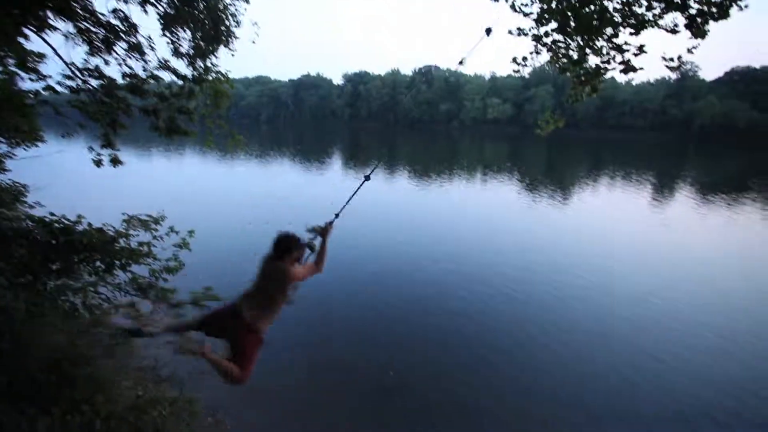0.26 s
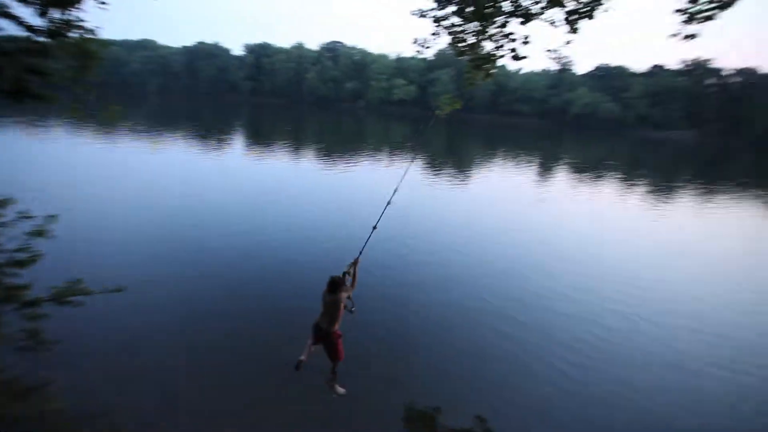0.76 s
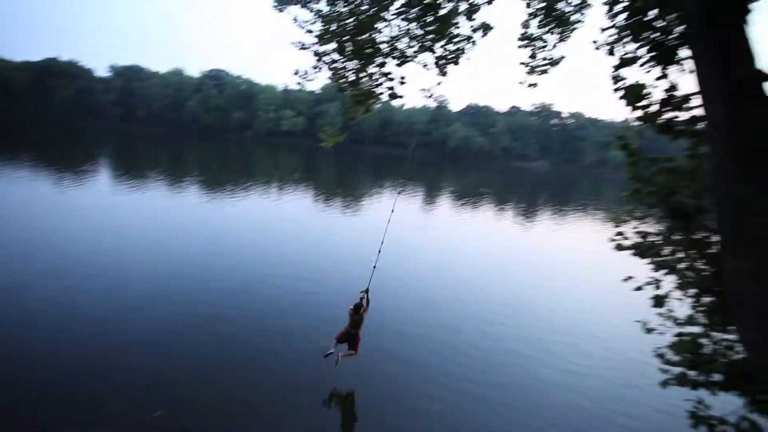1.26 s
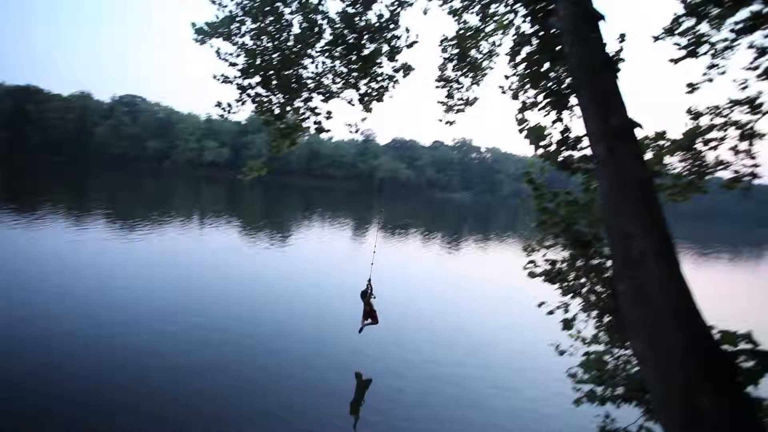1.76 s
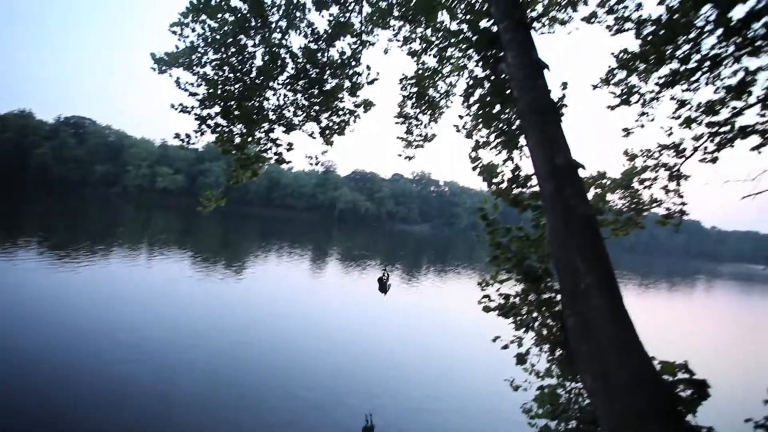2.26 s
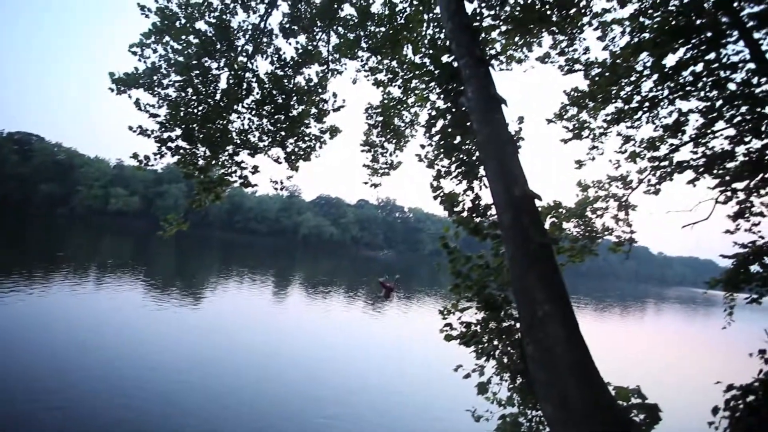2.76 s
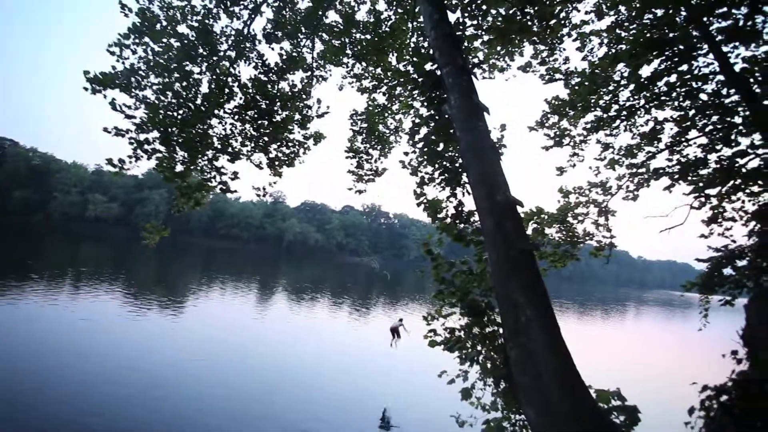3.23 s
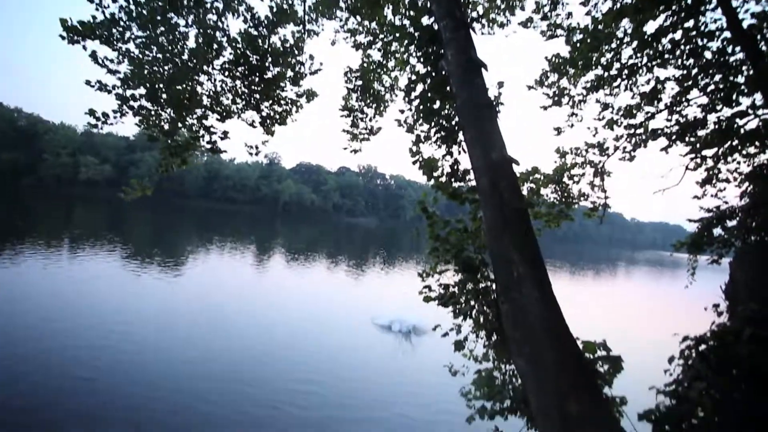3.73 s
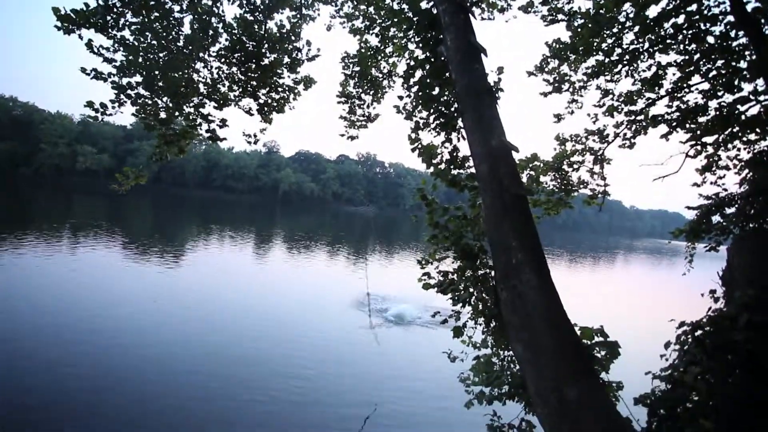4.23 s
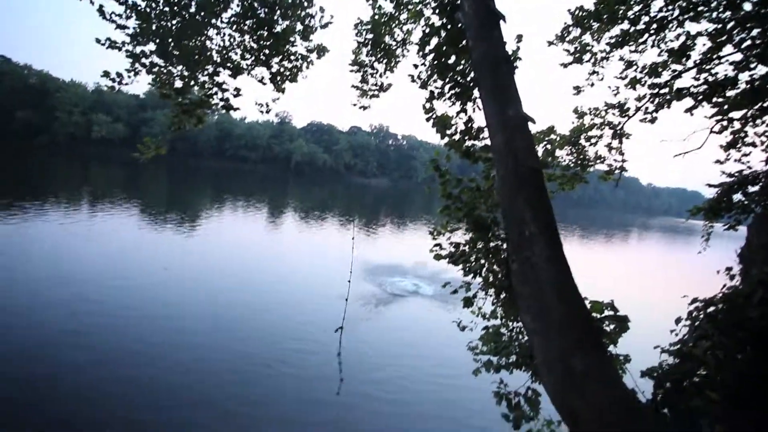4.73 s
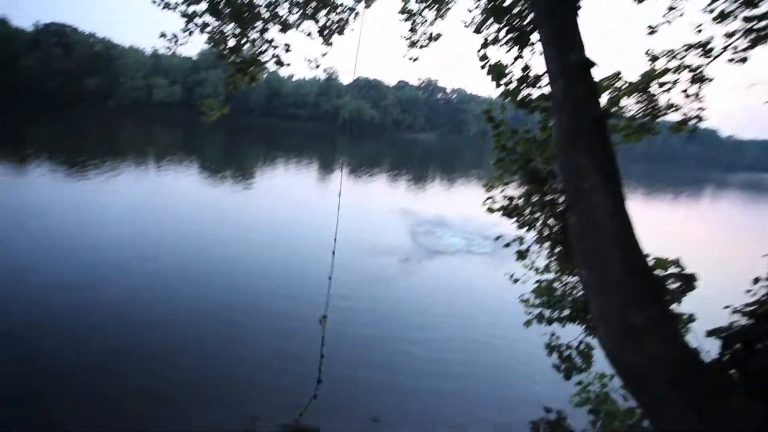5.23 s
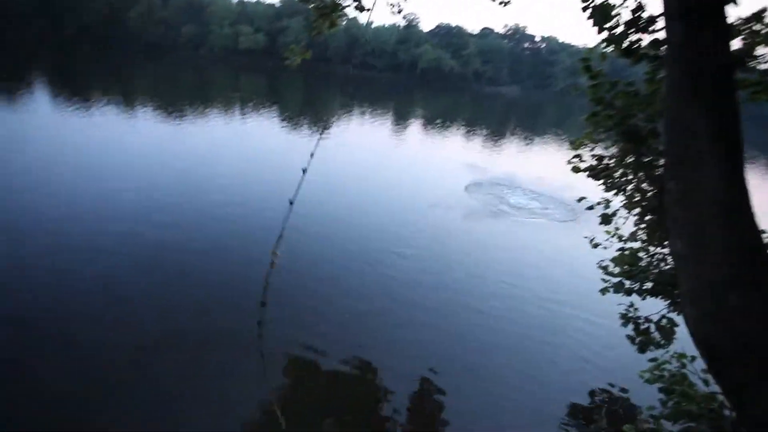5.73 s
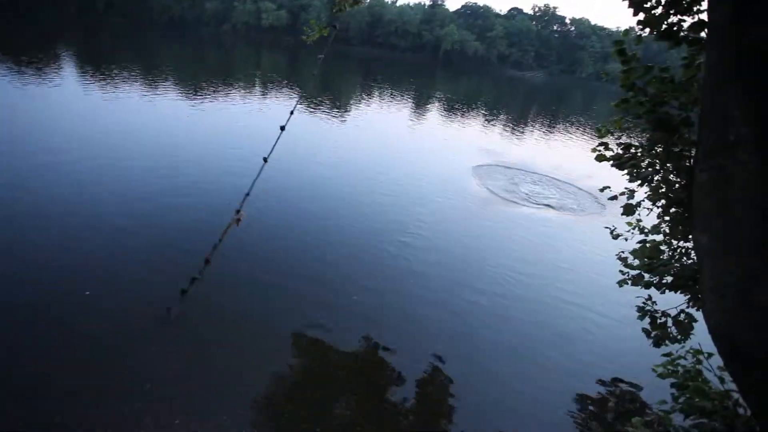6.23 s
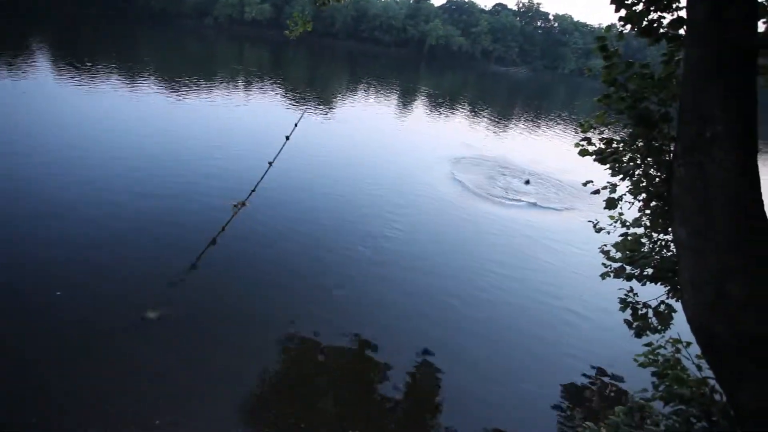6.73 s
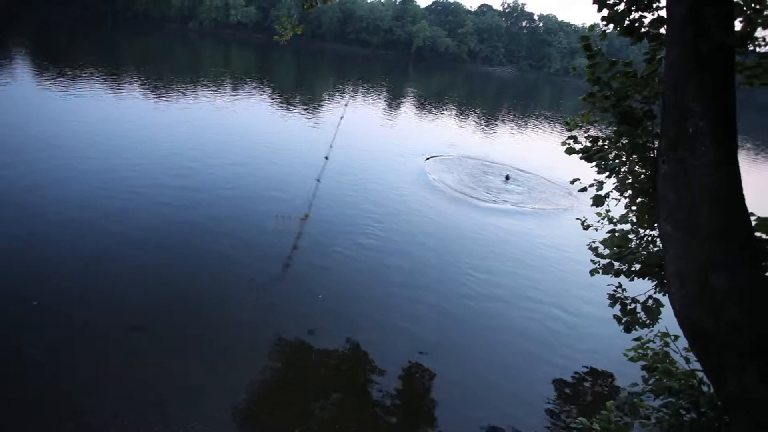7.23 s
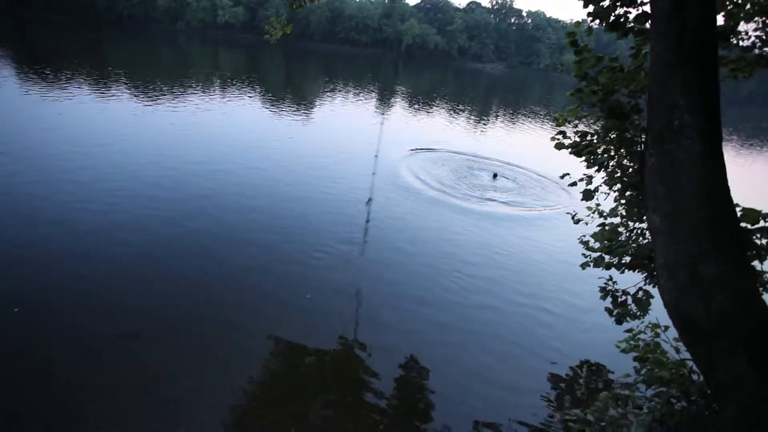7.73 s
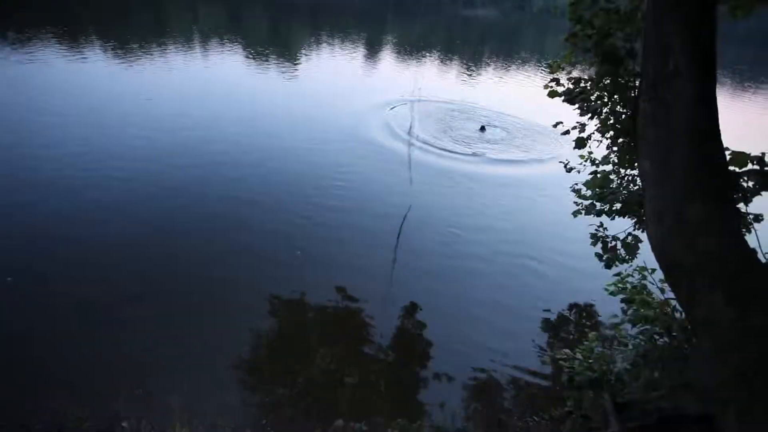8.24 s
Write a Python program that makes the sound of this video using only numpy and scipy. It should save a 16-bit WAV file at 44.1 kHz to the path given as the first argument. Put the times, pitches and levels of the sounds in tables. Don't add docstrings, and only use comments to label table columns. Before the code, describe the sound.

Outdoors by a wooded lake, cicadas hiss brightly and continuously, with weak far-off engines below. First comes a dry twig crack and leaf brush, then a small rope creak. After a pause, feet, legs and body slap the water in quick succession, followed by gulping bubbles and spray. A shower of droplets falls and thins; near the end small hollow water knocks and lapping come close. The camera's automatic gain ducks after the splash, then recovers.

```python
import sys
import numpy as np
from scipy import signal
from scipy.fft import rfft, irfft, next_fast_len
from scipy.io import wavfile
from scipy.ndimage import uniform_filter1d, map_coordinates

SR = 44100
rng = np.random.default_rng(int(sys.argv[2]) if len(sys.argv) > 2 else 0)


def field_ratio(decibels):
    return 10 ** (np.asarray(decibels, dtype=float) / 20)


def inscribe(sig):
    pcm = np.round(np.clip(np.atleast_2d(sig).T, -1, 1) * 32767)
    wavfile.write(sys.argv[1], SR, pcm.astype(np.int16))


N = 374409
TIME = np.arange(N) / SR

# f/Hz, width/Hz, level/dB
TYMBAL_MODES = [(4650, 67, -16), (6000, 750, -7)]
# f/Hz, level/dB per Hz
CHORUS_SPECTRUM = [(1500, -65.5), (2500, -32.5), (3470, -25), (4200, -11), (5010, -9), (5760, -1.5),
                   (6180, 1.5), (6870, 0), (8330, -6), (10100, -23), (11000, -34), (13000, -37.5),
                   (15800, -52)]
# t/s, level/dB
CHORUS_EFFORT = [
    (0, -1),
    (2.1, .5),
    (2.4, 0),
    (3.2, .5),
    (5, 0),
    (8.4, 0),
]
# f/Hz, level/dB per Hz
AIR_SPECTRUM = [(15, -57.5), (25, -15.5), (92, -4.5), (186, -8.5), (224, -7), (259, -8), (353, -14.5),
                (556, -18), (774, -15), (992, -13), (1560, -12.5), (2620, -22.5), (3500, -25.5),
                (4550, -61), (7700, -120)]
# f/Hz, level/dB per Hz
RUMBLE_SPECTRUM = [(18, -46), (30, -24.5), (38, -15), (54, -1), (92, 4), (118, -13), (150, -12), (167, -5),
                   (180, -0.5), (230, -40.5), (400, -120)]
# t/s, peak level/dB
TRAFFIC_PASSES = [
    (0, -54),
    (1.8, -48),
    (3.2, -42),
    (5.2, -39),
    (7.4, -37.5),
]
# t/s, peak level/dB
MOTOR_REVS = [
    (.95, -32.5),
    (2.0, -37),
    (2.65, -36.5),
    (3.4, -41.5),
    (5.5, -41.5),
]
# t/s, peak level/dB
ENGINE_PULSES = [
    (0, -39),
    (.8, -46),
    (2.5, -40),
]
# f/Hz, level/dB, t60/s
TWIG_MODES = [(1910, -2, 0.021), (2350, 0, 0.016), (2800, -17, 0.022), (3590, 11, 0.0064),
              (4200, -6.5, .012), (3080, -9, 0.021), (10560, -18, .004)]
# t/s, peak level/dB
LEAF_BRUSHES = [
    (.165, -36.5),
    (.215, -40),
]
# f/Hz, level/dB per Hz
LEAF_SPECTRUM = [(800, -19), (1600, -12), (2600, -9.5), (3500, -4.5), (8000, 3), (12000, -14.5),
                 (15500, -17)]
# t/s, peak level/dB, f/Hz
ROPE_CREAKS = [
    (2.123, -31, 553),
    (2.151, -26.5, 546),
    (2.18, -24.5, 562),
    (2.235, -28.5, 555),
]
# t/s, level/dB, t60/s, low f/Hz, high f/Hz
WATER_SLAPS = [
    (3.474, -4.5, 0.016, 300, 4500),
    (3.478, -8.5, .03, 396, 5040),
    (3.488, -15, 0.013, 1500, 5000),
    (3.5113, 0, .02, 2020, 4500),
    (3.515, 9, 0.012, 500, 3500),
    (3.54, -19, .006, 1990, 11950),
    (3.5705, 2, .003, 5000, 12000),
    (3.5905, 14.5, 0.0055, 1400, 9000),
    (3.5935, 2, 0.013, 1500, 5830),
]
# t/s, level/dB, f/Hz, t60/s
CLOSING_CAVITIES = [(3.474, -17, 1100, .04), (3.475, -15, 450, .05), (3.512, -3, 680, .035),
                    (3.518, -4, 620, .03), (3.512, -13, 400, .04), (3.538, -15, 520, .05),
                    (3.5912, -4, 1620, .014), (3.5912, -5, 1900, .012), (3.571, -1, 8800, .005),
                    (3.5915, 0, 4750, .016), (3.5915, -7, 5500, .012), (3.63, -30, 400, .06),
                    (3.955, -29, 420, .07), (4.02, -30, 400, .07)]
# t/s, peak level/dB, f/Hz
AIR_GULPS = [
    (3.514, -12, 119),
    (3.548, -17, 132),
    (3.698, -18, 137),
    (3.729, -18.5, 110),
    (3.804, -19.5, 176),
    (3.85, -27, 134),
    (3.953, -21, 152),
    (3.975, -22, 207),
]
# t/s, strength level/dB
WATER_SURGES = [
    (3.474, 1.5),
    (3.512, 1),
    (3.55, -2),
    (3.597, 11),
]
# level/dB, fall/(dB/s)
SURGE_LAYERS = [
    (-24.5, 69),
    (-17.5, 94.5),
    (-35, 89),
]
# t/s, strength level/dB
WATER_SHOWERS = [
    (3.83, -2.5),
    (4.0, -5),
    (4.27, 2),
    (4.63, -4.5),
    (5.07, -11),
    (5.5, -14.5),
]
# level/dB, rise/(dB/s), fall/(dB/s), lag/s
SHOWER_LAYERS = [
    (-26, 16.8, 14.5, 0.054),
    (-19.5, 27.6, 24.5, -0.004),
    (-29, 14, 24, -.02),
]
# f/Hz, level/dB per Hz
BUBBLE_SPECTRUM = [(120, -38.5), (200, -7.5), (324, -1), (433, -5.5), (514, -5), (660, 0), (807, -7.5),
                   (883, -4.5), (1170, -1.5), (1410, -6.5), (1610, -1.5), (2200, -18), (2860, -31),
                   (4840, -120)]
# f/Hz, level/dB per Hz
SPRAY_SPECTRUM = [(900, -18), (1800, -7), (3000, -2), (5000, 0), (8000, 3.5), (11000, -11.5),
                  (15800, -36.5)]
# f/Hz, level/dB per Hz
MIST_SPECTRUM = [(6000, -13.5), (9500, 3), (11000, -2.5), (13000, -6), (15700, -12.5)]
# t/s, peak level/dB
LAKE_HEAVES = [
    (3.62, -22),
    (4.6, -40),
    (5.4, -46),
]
# t/s, peak level/dB, f/Hz
FALLING_DROPS = [(4.003, -17, 1190), (4.146, -12, 1700), (4.247, -15, 1590), (4.38, -12, 1180),
                 (4.421, -13.5, 655), (4.467, -24.5, 2780), (4.53, -15, 1180), (4.601, -9, 1670),
                 (4.66, -18, 660), (4.71, -18, 623), (4.869, -15, 1630), (4.94, -15, 1180),
                 (5.057, -13, 1200), (5.188, -18, 1220), (5.305, -13, 1730), (5.586, -32, 678),
                 (6.398, -23, 1130), (6.922, -24, 934), (7.558, -25, 3000), (8.119, -24, 1680)]
# t/s, peak level/dB, rise/(dB/s), fall/(dB/s)
MIST_DRIFTS = [
    (5.7, -45, 13, 3),
    (8.36, -39.5, 34, 30),
]
# t/s, peak level/dB
HOLLOW_KNOCKS = [(6.461, -19), (6.626, -25), (6.862, -19), (7.015, -20), (7.177, -15), (7.288, -21),
                 (7.36, -17), (7.414, -25), (7.494, -18), (7.97, -16), (8.215, -18), (8.248, -18),
                 (8.29, -18), (8.32, -16), (8.345, -10.5)]
# t/s, level/dB, f/Hz, t60/s, relative glide
RISING_BUBBLES = [
    (6.495, -33, 1710, 0.083, 1.3),
    (8.23, -25, 2900, .04, 0.055),
    (8.335, -22.5, 2350, 0.079, .05),
    (8.35, -22, 1850, 0.053, .05),
]
# t/s, strength level/dB, brightness/dB
BANK_WAVELETS = [(6.5, -40.5, 1.5), (6.65, -47.5, -2), (6.9, -39, -2), (7.0, -41.5, 1), (7.13, -44, 2),
                 (7.24, -44, 2.5), (7.36, -37, 0.5), (7.47, -44.5, 6.5), (7.53, -48, -8), (7.92, -55, -4),
                 (8.2, -44, -6), (8.27, -39, 3), (8.36, -40, 4)]
# t/s, depth/dB
GAIN_DUCKS = [
    (0, 3),
    (.045, 6),
    (3.497, 4),
    (3.522, 5),
    (3.598, 18),
]


def unit(x):
    return x / np.sqrt(np.mean(x ** 2) + 1e-20)


def along(points, hz):
    f, level = np.transpose(points)
    return np.interp(np.log(hz + 1), np.log(f + 1), level, left=-120, right=-120)


def wobble(rate):
    knots = rng.standard_normal(int(N * rate / SR) + 4)
    return map_coordinates(knots, [np.arange(N) * rate / SR])


def phase_of(hz):
    return 2 * np.pi * np.cumsum(hz) / SR


def coloured(x, spectrum):
    m = next_fast_len(N + 8192)
    gain = field_ratio(along(spectrum, np.fft.rfftfreq(m, 1 / SR)))
    return unit(irfft(rfft(x, m) * gain, m)[:N])


def patchy(patchy_db):
    z = signal.stft(rng.standard_normal(N), nperseg=512)[2]
    field = uniform_filter1d(rng.standard_normal(z.shape), size=6, axis=0)
    field = uniform_filter1d(field, size=12, axis=1)
    return signal.istft(z * field_ratio(patchy_db * unit(field)), nperseg=512)[1][:N]


def grains(hz, spread, cycles, size_db, rise, count):
    u, g = rng.random((count, 2)), rng.standard_normal(count)
    pitch = np.clip(hz * np.exp(spread * g), hz / 3, 15000)[:, None]
    k = np.arange(min(int(9 * cycles * SR / hz), 1200))
    turns = k * pitch / SR
    wave = np.sin(2 * np.pi * turns * (1 + rise * turns / cycles))
    wave *= np.exp(-turns / cycles) * (1 - np.exp(-2 * turns))
    wave *= field_ratio(-size_db * np.log(1 - u[:, 1:]))
    at = (u[:, :1] * N).astype(int) + k
    return unit(np.bincount(at.ravel(), wave.ravel(), N + len(k))[:N])


def add_mode(track, s, db, hz, t60, attack=0.00079, rise=0.):
    t = np.arange(SR // 4) / SR
    envelope = field_ratio(db - 60 * t / t60) * (1 - np.exp(-t / attack))
    track[round(s * SR):][:len(t)] += envelope * np.sin(2 * np.pi * hz * t * (1 + rise * t / t60))


def swells(events, rise, fall):
    t = np.arange(0, N + 16, 16) / SR
    power = sum(field_ratio(2 * (db + np.minimum(abs(rise) * (t - s), abs(fall) * (s - t)))) for s, db in events)
    return np.interp(TIME, t, np.sqrt(power))


def cicadas():
    clicks = 0
    for hz, width_hz, db in TYMBAL_MODES:
        clicks = clicks + field_ratio(db) * grains(hz, spread=.3 * width_hz / hz, cycles=4, size_db=1.5,
                                           rise=0., count=14000)
    clicks = coloured(clicks, [(3500, -29.0), (4500, 17.0), (9000, -10), (11000, -22)])
    blur = coloured(patchy(patchy_db=0.5), CHORUS_SPECTRUM)
    effort_s, effort_db = np.transpose(CHORUS_EFFORT)
    swell_db = np.interp(TIME, effort_s, effort_db) + .5 * wobble(2.15) + 0.097 * wobble(9)
    return field_ratio(-12.5 + swell_db) * unit(blur + field_ratio(-17.5) * clicks)


def air():
    breeze_db = -30.5 - 0.95 * TIME + 0.34 * wobble(2.64)
    return field_ratio(breeze_db) * coloured(patchy(patchy_db=1.0), AIR_SPECTRUM)


def traffic():
    level = swells(TRAFFIC_PASSES, rise=6.5, fall=3.2) * field_ratio(-1.5 + 1.3 * wobble(5.9))
    return level * coloured(patchy(patchy_db=1.0), RUMBLE_SPECTRUM)


def motors():
    phase = phase_of(221 + 1.7 * wobble(6))
    beat = 1 + .55 * np.cos(phase_of(11.4 + 1.2 * wobble(3)))
    tone = np.sin(phase) + field_ratio(-29.0) * np.sin(2 * phase)
    drone = swells(MOTOR_REVS, rise=30, fall=9.8) * field_ratio(2.3 * wobble(6.3)) * beat * tone
    pulse = 1 + np.cos(2 * np.pi * 4.3 * (TIME - .08))
    throb = swells(ENGINE_PULSES, rise=8, fall=18) * pulse * np.sin(2 * np.pi * 86 * TIME)
    hum = field_ratio(-42.5 + 1.6 * wobble(4.9)) * np.sin(phase_of(107 + 1.5 * wobble(3.1)))
    return drone + throb + hum


def twig():
    x = np.zeros(N + SR)
    for hz, db, t60 in TWIG_MODES:
        add_mode(x, .0385, db, hz, t60)
    return x[:N]


def leaves():
    flicks = grains(6000, spread=.7, cycles=.7, size_db=1.5, rise=0., count=14000)
    rustle = coloured(patchy(patchy_db=1) + .7 * flicks, LEAF_SPECTRUM)
    return field_ratio(17.5) * swells(LEAF_BRUSHES, rise=170, fall=113) * rustle


def rope():
    x = np.zeros(N + SR)
    for s, db, hz in ROPE_CREAKS:
        add_mode(x, s, db + 5.5, hz, .06, attack=0.0028)
        add_mode(x, s, db + 2, 1.75 * hz, .04, attack=.004)
    return x[:N]


def slaps():
    x, t = np.zeros(N + SR), np.arange(SR // 20) / SR
    for s, db, t60, low_hz, high_hz in WATER_SLAPS:
        band = signal.butter(2, [low_hz, high_hz], "band", fs=SR)
        burst = signal.lfilter(*band, rng.standard_normal(len(t)))
        x[round(s * SR):][:len(t)] += field_ratio(db - 60 * t / t60) * burst
    return x[:N]


def cavities():
    x = np.zeros(N + SR)
    for s, db, hz, t60 in CLOSING_CAVITIES:
        add_mode(x, s, db, hz, t60, attack=0.0013, rise=-0.018)
    for s, db, hz in AIR_GULPS:
        add_mode(x, s, db + 1, 1.1 * hz, .07, attack=0.004, rise=-0.091)
    return x[:N]


def splash():
    bubbles = patchy(patchy_db=.8)
    bubbles = bubbles + .3 * grains(1200, spread=.7, cycles=1.5, size_db=1.5, rise=.04, count=7000)
    spray = patchy(patchy_db=1.5)
    spray = spray + 0.53 * grains(2770, spread=0.57, cycles=1.2, size_db=1.7, rise=0., count=15000)
    mist = patchy(patchy_db=1.5)
    mist = mist + .6 * grains(11000, spread=.3, cycles=1.2, size_db=1.8, rise=0., count=9000)
    layers = [field_ratio(-0.5) * coloured(bubbles, BUBBLE_SPECTRUM),
              field_ratio(3.5) * coloured(spray, SPRAY_SPECTRUM),
              field_ratio(-3.5) * coloured(mist, MIST_SPECTRUM)]
    x = np.zeros(N)
    for layer, (surge_db, dies), (shower_db, rise, fall, lag) in zip(layers, SURGE_LAYERS, SHOWER_LAYERS):
        surge = field_ratio(surge_db) * swells(WATER_SURGES, 8000, dies)
        shower = field_ratio(shower_db) * swells(np.add(WATER_SHOWERS, [lag, 0]), rise, fall)
        x += np.hypot(surge, shower) * layer
    return (TIME > WATER_SURGES[0][0] - .003) * x


def churn():
    heave = coloured(patchy(patchy_db=6.5), [(25, -22), (60, -3), (120, -1.5), (220, -3.5), (400, -24)])
    return (TIME > WATER_SURGES[0][0]) * swells(LAKE_HEAVES, rise=40, fall=22) * heave


def add_drop(track, s, db, hz):
    add_mode(track, s, db - 1.5, hz, 30 / hz, attack=0.0031, rise=0.04)


def drops():
    x = np.zeros(N + SR)
    for s, db, hz in FALLING_DROPS:
        add_drop(x, s, db, hz)
    return x[:N]


def haze():
    level = sum(swells([(s, db)], rise, fall) for s, db, rise, fall in MIST_DRIFTS)
    return level * coloured(patchy(patchy_db=1.5), MIST_SPECTRUM)


def knocks():
    x = np.zeros(N + SR)
    for s, db in HOLLOW_KNOCKS:
        add_drop(x, s, db, 1310 * (1 + .03 * rng.standard_normal()))
    return x[:N]


def plinks():
    x = np.zeros(N + SR)
    for s, db, hz, t60, glide in RISING_BUBBLES:
        add_mode(x, s, db, hz, t60, attack=0.0045, rise=glide)
    return x[:N]


def wavelet_level(lean, rise=130, fall=170):
    return swells([(s, db + lean * bright_db) for s, db, bright_db in BANK_WAVELETS], rise, fall)


def lapping():
    wash = coloured(patchy(patchy_db=4.0), [(250, -5.5), (500, -4), (1000, 2), (1500, -18)])
    hollow = grains(1340, spread=0.042, cycles=12, size_db=2.5, rise=.01, count=1500)
    trickle = coloured(patchy(patchy_db=4.5), [(1200, 4), (1800, 1.0), (3300, -1.5), (5000, -25)])
    x = field_ratio(3.0) * wavelet_level(-0.78) * wash
    x += field_ratio(-4.5) * wavelet_level(.6, rise=60) * hollow
    return x + field_ratio(2.0) * wavelet_level(1) * trickle


def ducking_db():
    creep_db, creep_s, recover_db_per_s = 8.5, 1.0, 13.5
    left = []
    for s, db in GAIN_DUCKS:
        slow = min(db, creep_db) * np.exp(-abs(TIME - s) / creep_s)
        fast = np.maximum(db - creep_db - recover_db_per_s * (TIME - s), 0)
        left.append((TIME >= s) * (slow + fast))
    return -uniform_filter1d(np.max(left, axis=0), size=132)


def scene():
    background = cicadas() + air() + traffic() + motors()
    near = twig() + leaves() + rope() + slaps() + cavities() + drops() + knocks() + plinks()
    lake = splash() + churn() + haze() + lapping()
    return np.tile(background + near / field_ratio(ducking_db()) + lake, (2, 1))


def roll_off(x):
    return signal.sosfilt(signal.butter(12, 15750, fs=SR, output="sos"), x)


def record(dry):
    x = signal.lfilter(*signal.butter(1, 30, "high", fs=SR), dry * field_ratio(ducking_db()))
    x = np.clip(x, -1, 1) * (TIME < 8.3757)
    return roll_off(x)


dry = scene()
out = record(dry)
inscribe(out)
```